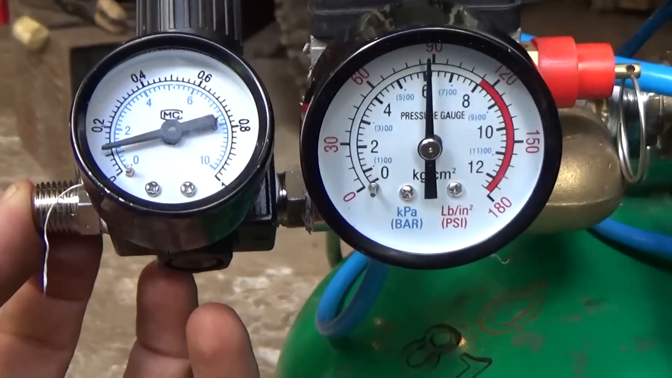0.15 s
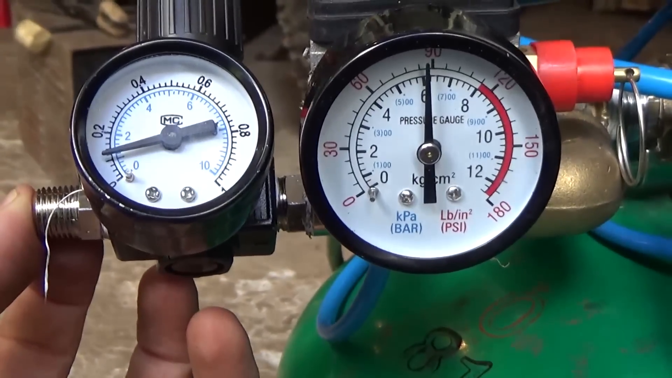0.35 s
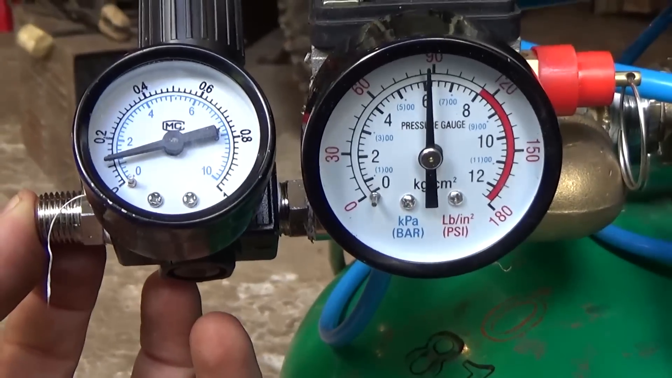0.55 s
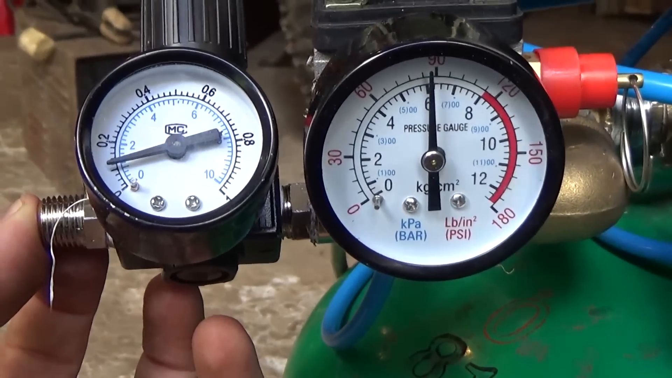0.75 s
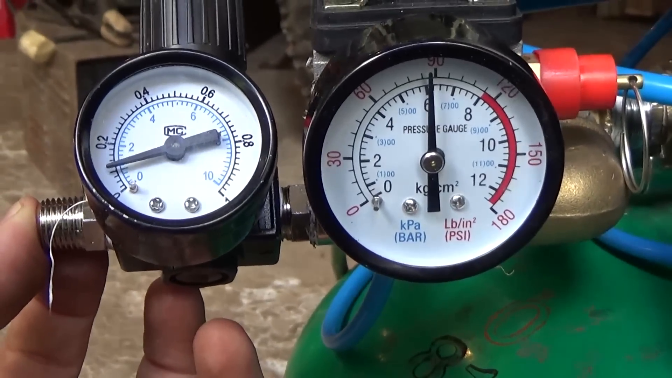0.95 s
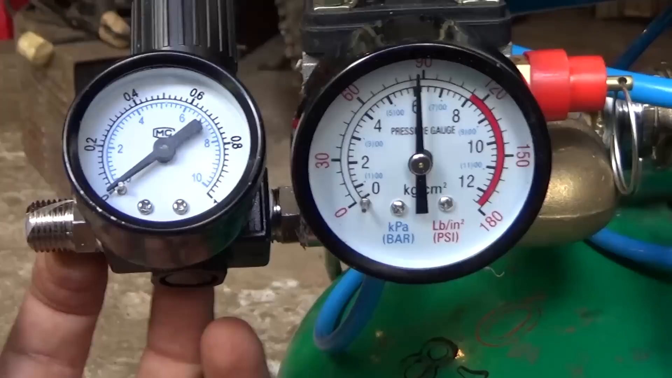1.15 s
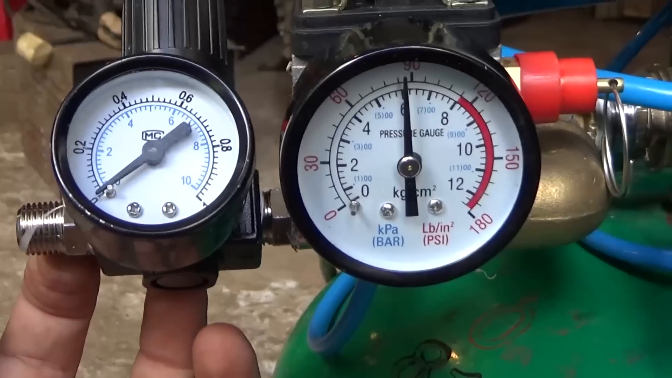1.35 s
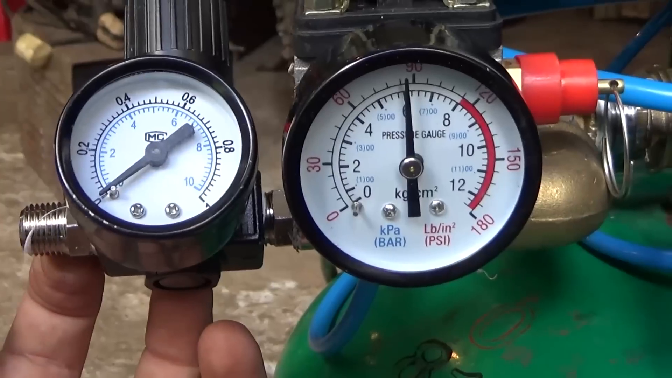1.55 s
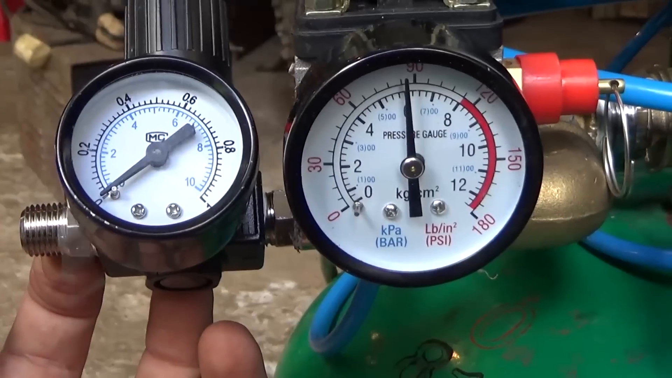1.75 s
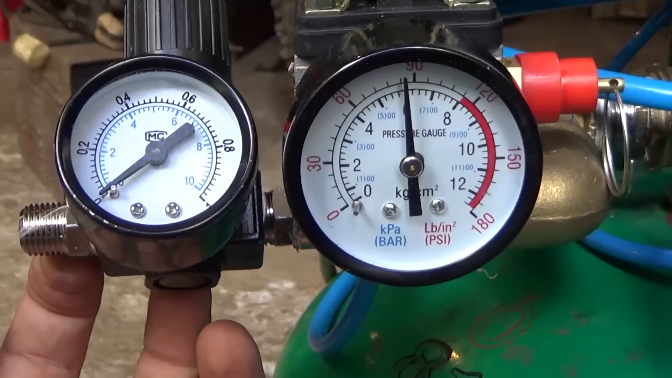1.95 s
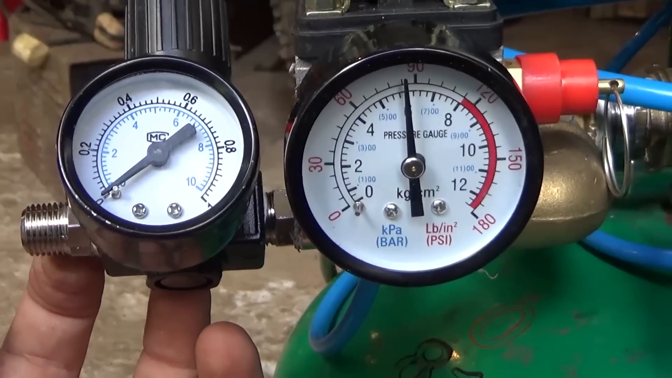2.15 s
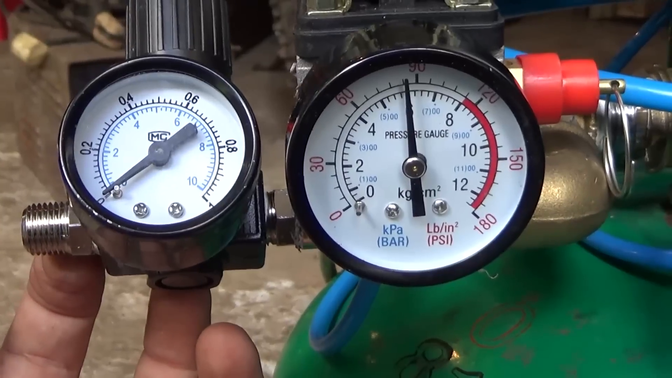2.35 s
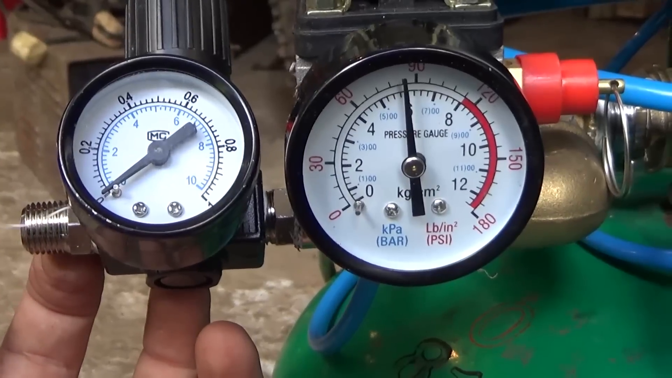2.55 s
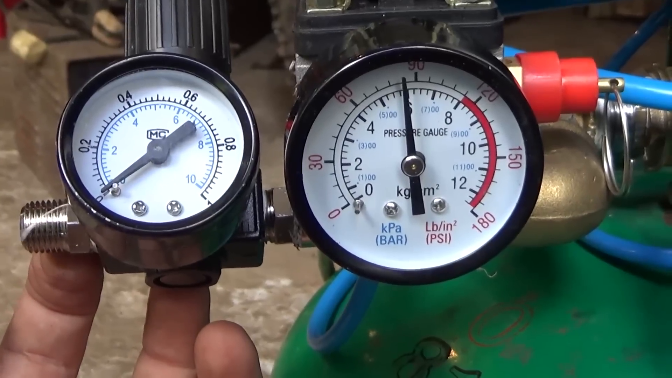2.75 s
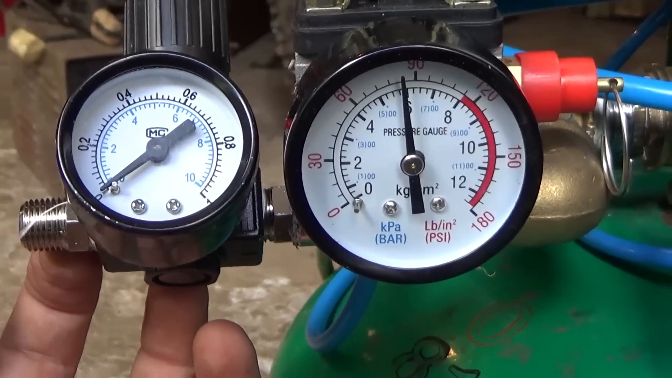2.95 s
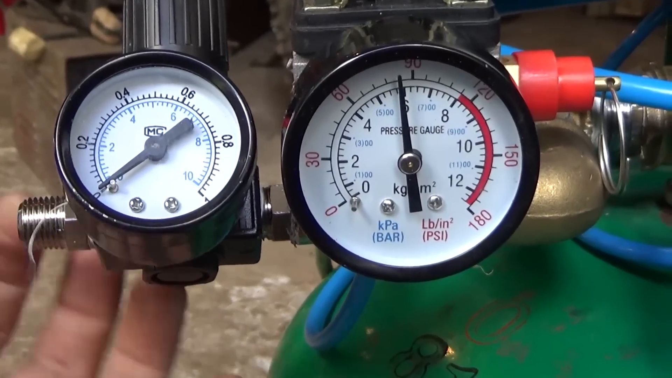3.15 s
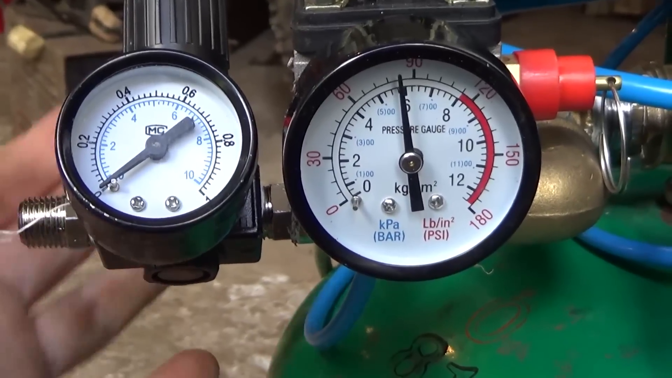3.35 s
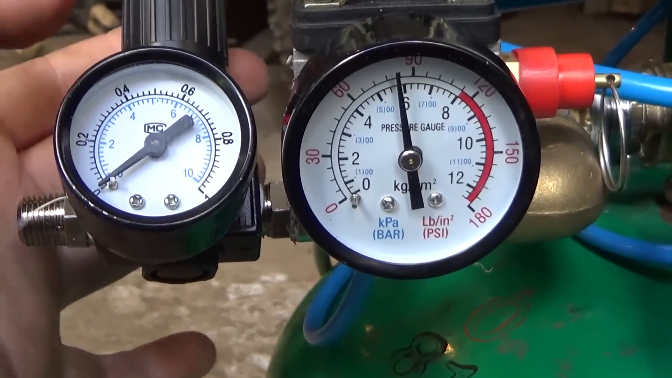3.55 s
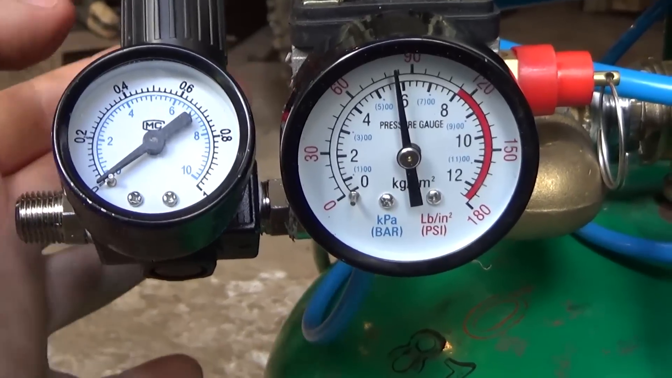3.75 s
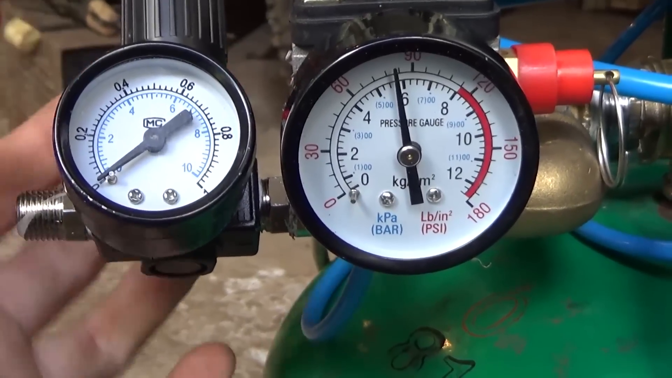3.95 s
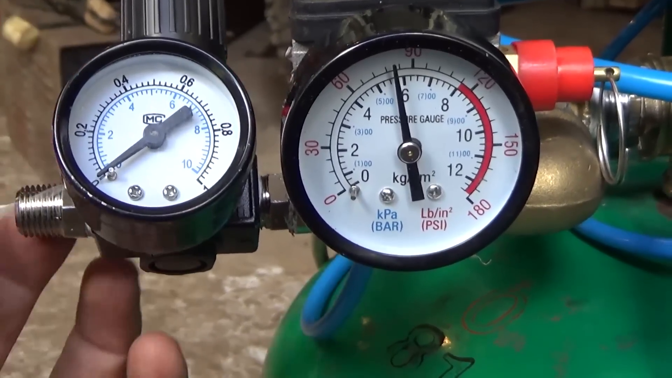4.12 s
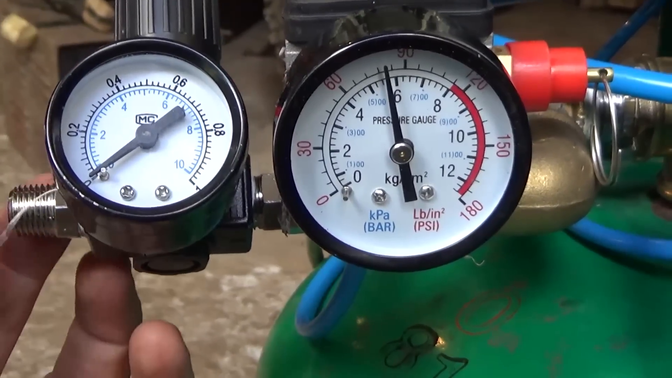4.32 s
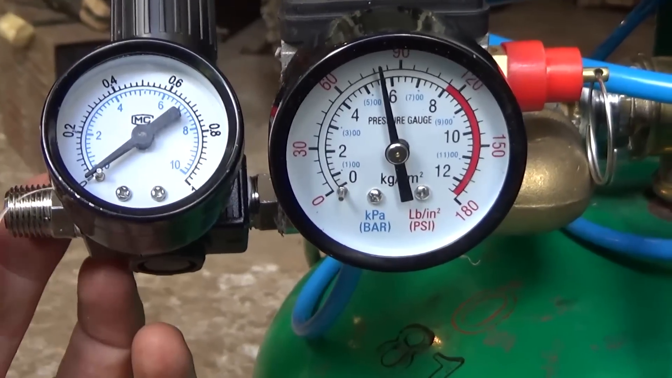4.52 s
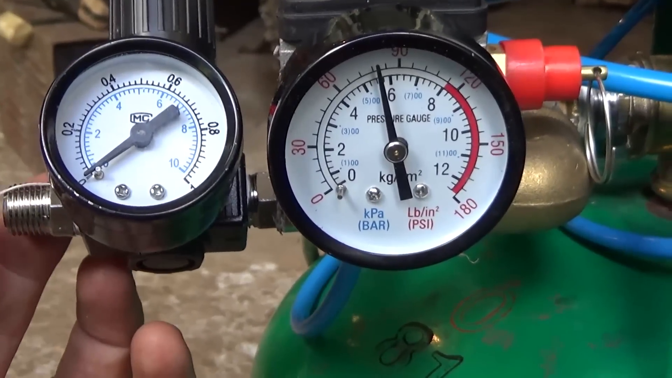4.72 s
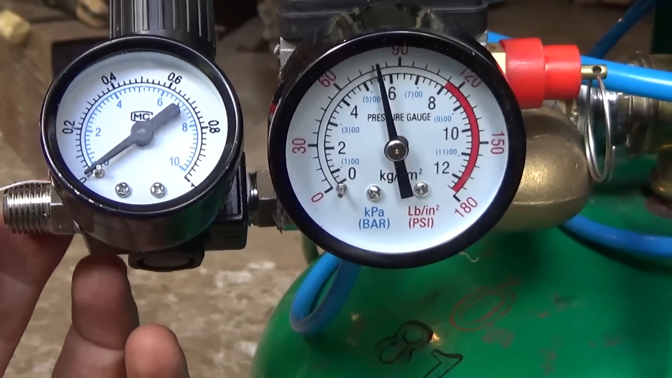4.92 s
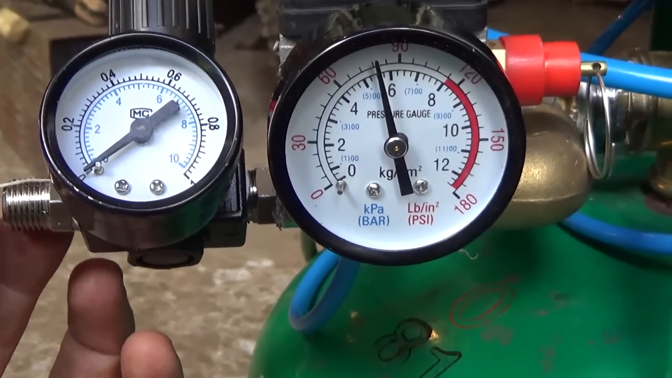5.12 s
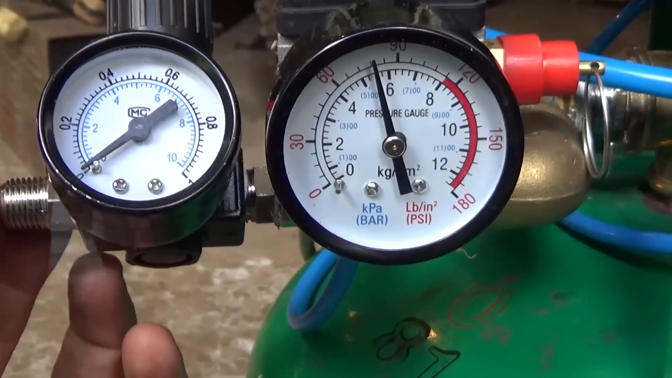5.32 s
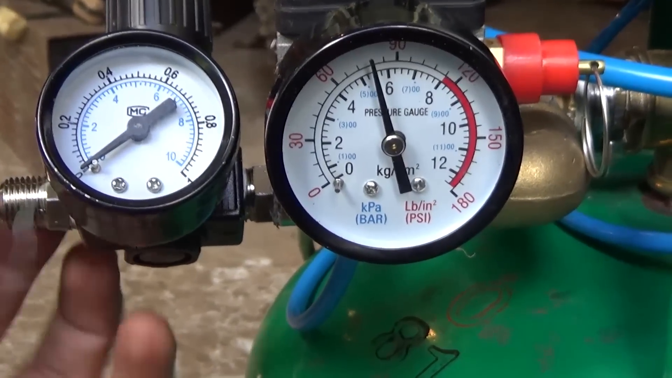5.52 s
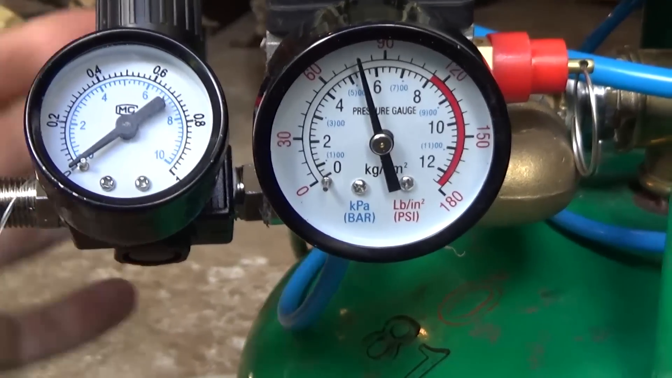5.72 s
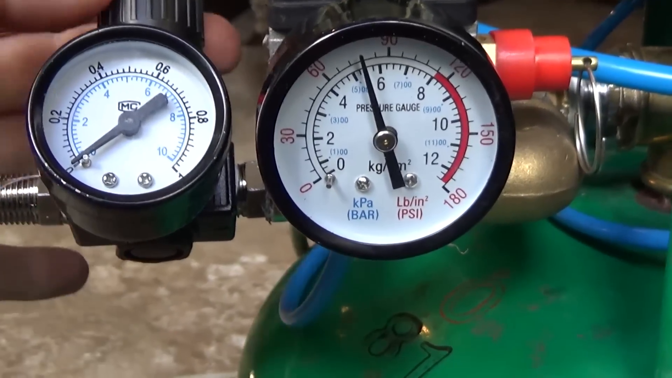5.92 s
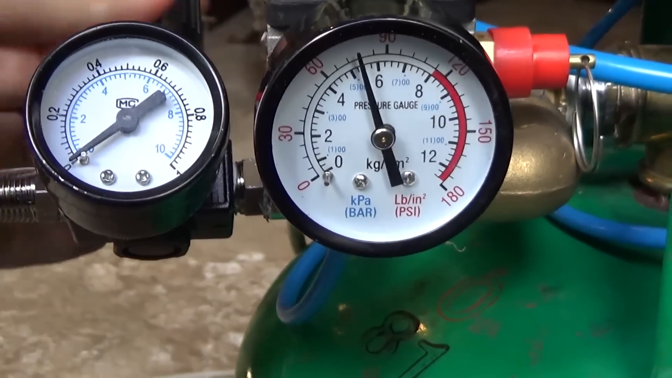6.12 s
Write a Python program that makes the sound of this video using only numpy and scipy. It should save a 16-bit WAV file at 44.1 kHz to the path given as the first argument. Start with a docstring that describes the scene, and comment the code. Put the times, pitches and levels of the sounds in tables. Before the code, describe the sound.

A quiet workshop with a faint motor hum and three tiny, fading finger ticks on a metal regulator. At one second the valve opens with a dull puff and spit, and air blasts steadily from a bare outlet very close to the stereo microphone. The bright, piercing hiss is steady at first, then swishes and changes colour as a hand moves round it, thins briefly near the end, and returns full to the cut.

```python
"""Over a faintly humming workshop, fingers touch a compressor's regulator three times, ever more softly.
At one second the valve leaks, then opens with a dull puff and a spit of air: filtered noise, briefly swelling.
The tank vents through the bare outlet, close to the microphone: coloured noise, resonances and a bright crest.
After three seconds the low rumble fades and a moving hand adds echoes and swishes and shifts the crest.
Near 5.3 s the hand briefly shields the outlet and the hiss turns thin; then the full jet returns."""
import sys
import numpy as np
from scipy import signal
from scipy.fft import rfft, irfft
from scipy.io import wavfile
from scipy.ndimage import uniform_filter1d, map_coordinates

SR = 44100
rng = np.random.default_rng(int(sys.argv[2]) if len(sys.argv) > 2 else 0)


def file_out(sig):
    """Save sig as 16-bit WAV at sys.argv[1]."""
    # one column per channel
    cols = np.atleast_2d(sig).T
    # limit, then scale
    lim = np.clip(cols, -1, 1)
    pcm = np.round(lim * 32767).astype(np.int16)
    wavfile.write(sys.argv[1], SR, pcm)


N = 276948
TIME = np.arange(N) / SR
BINS = np.maximum(np.fft.rfftfreq(N, 1 / SR), 1)   # frequency in Hz, kept above 0 for the logarithms

# the valve: first leak, opening, full flow
LEAK_S, OPEN_S, OPEN_TIME_S, FULL_FLOW_S = 1.004, 1.03, 0.028, 1.073
SEAL_DB_PER_S = 930
# resonances overshoot after the opening, then the flow settles
SURGE_S, SURGE_LENGTH_S, SURGE_DB, SETTLED_S = 1.17, 0.044, 6.5, 1.22

# likeness of left and right in the jet's noise: frequency_hz, coherence (0-1)
JET_LIKENESS = [(30, 0.53), (70, 0.37), (160, .82), (350, 0.93), (650, 0.43), (1100, 0.8), (1600, 0.98),
                (3000, 1), (4000, 1), (5300, 1), (6300, 0.88), (9500, 0.96), (13000, 0.99), (15500, 0.99)]


def jet():
    """Close at the outlet: turbulence, driven resonances and a bright crest, all fluttering together."""
    air = shielded(hiss()) + roar() + outlet_ring() + bore_ring() + crest() + sizzle() + swishes()
    leak = ramp(LEAK_S, OPEN_S) ** 2
    seal_db = np.minimum(SEAL_DB_PER_S * (TIME - FULL_FLOW_S), 0)   # the seal lets go gradually
    flutter_db = 0.35 * drift(13)
    return air * leak * from_db(seal_db + flutter_db)


# colour of the broad turbulence: frequency_hz, relative_density_db (per Hz)
HISS_COLOUR = [(300, -37), (1000, -17), (1500, -13), (2500, -6), (3400, -6), (4150, -6), (4700, 0.5),
               (5300, 0), (5900, 0), (7000, -2.5), (9000, -0.5), (11000, -0.5), (13000, -7.5),
               (16000, -16.5)]
# broad hiss, before the spit and the hand: time_s, relative_level_db
HISS_LEVEL = [(1.25, -30.5), (3.388, -29.623), (3.62, -23), (3.875, -26.864), (4.004, -28.482),
              (4.512, -26.5), (5.177, -27.899), (5.563, -23.662), (5.643, -29.5), (5.853, -28.5),
              (6.201, -26.427)]


def hiss(spit_db=5.0):
    """Broad turbulence is coloured noise; the opening spit lifts it briefly."""
    level_db = in_time(HISS_LEVEL)[0] + spit_db * spit()
    return from_db(level_db) * noise(from_db(at_bins(HISS_COLOUR)), JET_LIKENESS)


# jet resonances around fitting and fingers: centre_hz, nominal_width_hz, relative_level_db
ROAR_MODES = [(1468, 207, -4), (1747, 160, 2.5), (1898, 150, -0.5), (2125, 250, 0), (2523, 185, 0.5),
              (2910, 390, -5), (3640, 1100, -10.5)]


def roar(level_db=-33.0):
    """Turbulence drives the lower resonances around the fitting and fingers."""
    return from_db(level_db + roar_change_db()) * noise(resonances(ROAR_MODES), JET_LIKENESS)


# resonances of the outlet: centre_hz, nominal_width_hz, relative_level_db
OUTLET_MODES = [(6274, 190, -5.5), (6590, 280, -2), (6890, 140, 1.5), (7155, 160, 4.5), (7290, 100, -0.5),
                (7520, 104, 4), (7670, 170, -1)]
# ring of the outlet, before build-up and surge: time_s, relative_level_db
OUTLET_LEVEL = [(1.25, -29.5), (2.879, -29), (3.278, -26), (3.335, -19.811), (3.494, -27.337),
                (3.664, -21.5), (3.81, -36), (3.95, -23), (4.154, -28), (4.216, -24), (4.664, -28.208),
                (5.243, -20.738), (5.5, -33.479), (5.572, -25.5), (5.784, -22), (5.82, -26.562),
                (6.117, -22.5), (6.281, -24.043)]


def outlet_ring():
    """The outlet's resonances build up with the flow and overshoot."""
    level_db = in_time(OUTLET_LEVEL)[0] + building_db() + SURGE_DB * swell(SURGE_S, SURGE_LENGTH_S)
    return from_db(level_db) * noise(resonances(OUTLET_MODES), JET_LIKENESS)


# resonances of the bore: centre_hz, nominal_width_hz, relative_level_db
BORE_MODES = [(7920, 190, 2), (8310, 130, 1), (8630, 240, 0), (8990, 170, 1.5), (9350, 140, -6.5)]


def bore_ring(level_db=-31.0):
    """The bore's resonances ring steadily after the opening surge."""
    surging_db = level_db + SURGE_DB * swell(SURGE_S, SURGE_LENGTH_S)
    return from_db(surging_db) * noise(resonances(BORE_MODES), JET_LIKENESS)


# the free jet's crest, and what full cupping and the unsettled opening add
CREST_HZ, CUPPED_CREST_HZ, OPENING_CREST_HZ = 11330, -1050, -1400
CREST_WIDTH_HZ, OPENING_WIDTH_HZ = 2200, 890
CUPPED_CREST_DB, CREST_BUILD_SHARE = -0.8, 0.31
# crest, before cupping and build-up: time_s, relative_level_db
CREST_LEVEL = [(1.25, -18), (2.3, -18), (3.172, -17.5), (3.237, -21), (3.341, -20.5), (3.409, -22),
               (3.47, -14.5), (3.648, -20.5), (3.783, -14.5), (3.981, -22.328), (4.025, -17.5),
               (4.268, -20), (4.95, -20.5), (5.398, -20.5), (5.699, -21), (5.772, -26.29), (5.838, -23.513),
               (6.235, -18.5)]


def crest(steepness=2.57):
    """The jet's strongest eddies make a hump of noise whose centre and width move."""
    cup = cupping()
    unsettled = 1 - ramp(SURGE_S, SETTLED_S)
    level_db = in_time(CREST_LEVEL)[0] + CUPPED_CREST_DB * cup + CREST_BUILD_SHARE * building_db()
    centre_hz = CREST_HZ + CUPPED_CREST_HZ * cup + OPENING_CREST_HZ * unsettled
    width_hz = CREST_WIDTH_HZ + OPENING_WIDTH_HZ * unsettled
    hz, s, cells = signal.stft(rng.standard_normal((2, N)), SR, nperseg=512)
    hz = hz[:, None]
    centre, width = np.interp(s, TIME, centre_hz), np.interp(s, TIME, width_hz)
    hump = 1 / np.sqrt(1 + np.abs(2 * (hz - centre) / width) ** (2 * steepness))
    hump = hump / np.sqrt(1 + (6500 / (hz + 1)) ** 10)   # eddies this small make little low sound
    hump = hump / np.sqrt(np.sum(hump ** 2, axis=0))
    eddies = signal.istft(cells * hump, SR)[1][:, :N]
    return from_db(level_db) * rms_one(spread(eddies, JET_LIKENESS))


# colour of the highest treble: frequency_hz, relative_density_db (per Hz)
SIZZLE_COLOUR = [(10000, -40), (12300, -5), (13100, 12.5), (13700, 8), (14300, 6), (15000, 1), (15500, 6.5),
                 (16000, 0)]


def sizzle(level_db=-39.0, cupped_db=15.5, spit_db=9.5):
    """The highest noise grows as the hand cups the jet, and in the opening spit."""
    moving_db = level_db + cupped_db * cupping() + spit_db * spit()
    return from_db(moving_db) * noise(from_db(at_bins(SIZZLE_COLOUR)), JET_LIKENESS)


def spit(s=1.09, half_length_s=0.056):
    """The valve opens on a broad spit of air, a swell of height 1."""
    return swell(s, half_length_s)


def building_db(start_db=-10, full_s=1.155, build_time_s=0.034):
    """The resonances start weak and build up as the flow settles."""
    return start_db * (1 - ramp(full_s - build_time_s, full_s))


def roar_change_db(sag_db_per_s=.08, cupped_db=-1.5, shield_db=-11.0):
    """The roar builds up, sinks with the tank pressure and drops behind the hand."""
    emptying_db = -sag_db_per_s * (TIME - OPEN_S)
    hand_db = cupped_db * cupping() + shield_db * shielding()
    return building_db() + emptying_db + hand_db


# fingers graze the jet or rest at its edge: peak_s, half_length_s, relative_level_db, pitch_hz
SWISHES = [(3.24, .06, -28, 8600), (3.40, .07, -24.5, 9000), (3.66, .18, -29.5, 6080),
           (3.91, .105, -21.5, 9000), (4.056, .06, -28, 6440), (4.26, .08, -26, 9400),
           (4.9, .55, -26.5, 10380), (5.665, .031, -20, 9500), (5.776, .09, -20.5, 11850),
           (5.835, .05, -25.5, 8280), (6.2, .07, -34.5, 5550)]


def swishes(width_hz=830):
    """Each finger that grazes the jet sheds a band of noise with a pitch of its own."""
    out, white = 0, rng.standard_normal((2, N))
    for s, half_length_s, db, hz in SWISHES:
        edges = [hz - width_hz / 2, hz + width_hz / 2]
        band = signal.sosfilt(signal.butter(2, edges, "band", fs=SR, output="sos"), white)
        out = out + from_db(db) * swell(s, half_length_s) * rms_one(band)
    return spread(out, JET_LIKENESS) / np.sqrt(2)


# colour of the low rush: frequency_hz, relative_density_db (per Hz)
RUSH_COLOUR = [(25, -23), (70, -29), (140, -18.5), (250, -7), (400, -1.5), (700, 4), (1100, 2), (1500, -7),
               (2500, -13)]


def rush(level_db=-52.5, puff_db=-47.0, puff_s=1.085, puff_length_s=0.021, follow=0.37):
    """The low rush partly follows the roar; the first air leaves as a dull puff."""
    opening = ramp(OPEN_S, OPEN_S + OPEN_TIME_S)
    flow_gain = opening * from_db(level_db + follow * roar_change_db())
    flow = flow_gain * noise(from_db(at_bins(RUSH_COLOUR)), JET_LIKENESS)
    puff_modes = [(290, 75, -0.18), (486, 150, -1.1), (800, 410, 0)]
    puff_gain = from_db(puff_db) * swell(puff_s, puff_length_s)
    return flow + puff_gain * noise(resonances(puff_modes), ROOM_LIKENESS)


# colour of the deep flow rumble: frequency_hz, relative_density_db (per Hz)
RUMBLE_COLOUR = [(25, 4), (100, 1), (200, -6), (400, -20)]


def rumble(level_db=-78.0, fade_from_s=3.1, fade_to_s=3.4):
    """Deep turbulence, which fades as the hand leaves its place under the outlet."""
    held = ramp(OPEN_S, OPEN_S + OPEN_TIME_S) * (1 - ramp(fade_from_s, fade_to_s))
    return held * from_db(level_db) * noise(from_db(at_bins(RUMBLE_COLOUR)), JET_LIKENESS)


# how far the hand cups the jet: time_s, cupping (0 = clear of it, 1 = cupped round it)
CUPPING = [(1.25, 0.133), (3.073, 0.15), (3.413, 0.63), (3.609, 0.57), (3.811, 0.064), (3.923, 1.007),
           (4.044, -0.003), (4.121, 0.17), (4.142, 0.43), (4.303, 0.33), (4.393, 0.8), (4.992, 0.78),
           (5.087, 0.56), (5.58, 0.778), (5.652, 0.641), (5.748, 0.48), (5.913, 0.83), (6.263, 0.361)]


def cupping():
    """How far the hand cups the jet, at every sample, held between 0 and 1."""
    return np.clip(in_time(CUPPING)[0], 0, 1)


def hand_motion(full_speed=2.0, smooth_s=.25):
    """How busy the hand is: 0 at rest, 1 from so many full cupping moves a second."""
    speed = np.abs(np.gradient(cupping())) * SR
    return np.minimum(uniform_filter1d(speed, int(smooth_s * SR)) / full_speed, 1)


def palm_delay_ms(open_ms=0.424, cupped_ms=.208):
    """The echo off the palm comes later as the hand cups; full cupping adds cupped_ms."""
    return open_ms + cupped_ms * cupping()


# echo off the nearest finger: time_s, delay_ms, share (of the short waves, 0-1)
FINGER = [(1.4, 0.24, 0.12), (3.06, 0.25, 0.18), (3.168, 0.25, 0.292), (3.397, 0.23, 0.23),
          (3.501, 0.373, 0), (3.759, 0.29, 0.009), (3.959, 0.265, 0.25), (4.064, 0.205, 0.1),
          (4.26, 0.21, 0.45), (4.473, 0.198, 0.15), (4.929, 0.201, 0.193), (5.149, 0.22, 0.44),
          (5.375, 0.207, 0.4), (5.571, 0.207, 0.18), (5.647, 0.21, 0.27), (5.753, 0.32, 0.034),
          (6.044, 0.352, 0.005), (6.252, 0.332, 0.32)]


def hand(x, size_hz=3000, palm_share=.23, cupped_share=-.3):
    """Fingers and palm reflect mostly short waves; moving peaks and notches sweep through the hiss."""
    palm = palm_delay_ms(), np.maximum(palm_share + cupped_share * cupping(), 0)
    short_waves = irfft(rfft(x) / np.sqrt(1 + (size_hz / BINS) ** 2), N)
    for delay_ms, share in in_time(FINGER), palm:
        when = np.arange(N) - delay_ms * SR / 1000
        x = x + share * np.array([map_coordinates(side, [when], order=5) for side in short_waves])
    return x


def bounces(x, share=0.04, moving_share=0.11, count=3, shortest_ms=0.799, longest_ms=1.8, stretch=0.6):
    """Longer paths between palm and gauges draw gliding ripples, deepest as the hand moves."""
    palm_ms = palm_delay_ms()
    depth = share + moving_share * hand_motion()
    treble = irfft(rfft(x) / np.sqrt(1 + (5000 / BINS) ** 4), N)
    for k, path_ms in enumerate(np.geomspace(shortest_ms, longest_ms, count)):
        delay_ms = path_ms + stretch * (k + 1) * (palm_ms - palm_ms.mean())
        when = np.arange(N) - delay_ms * SR / 1000
        # each path adds one delayed copy of the same treble
        x = x + depth * np.array([map_coordinates(side, [when], order=3) for side in treble])
    return x


def shielding(from_s=5.33, to_s=5.57, edge_s=0.037):
    """1 while the hand shields the outlet, else 0, with short sloping edges."""
    inside_s = np.minimum(TIME - from_s, to_s - TIME)
    return np.clip(.5 + inside_s / edge_s, 0, 1)


def shielded(x, edge_hz=4350, open_db=1.0, shield_db=-5.0):
    """The shielding hand weakens the hiss below a steep edge."""
    lower = irfft(rfft(x) / (1 + (BINS / edge_hz) ** 20), N)
    return x + (from_db(open_db + shield_db * shielding()) - 1) * lower


# colour of the jet's stereo balance: frequency_hz, left_minus_right_db
JET_BALANCE = [(100, 1), (400, .4), (1100, 2.5), (2400, 1.2), (3800, 0.5), (5500, 0), (6300, 2.5),
               (8200, 2.5), (9500, 2.5), (11400, 2), (13600, 3.5), (15500, -4)]


def surroundings(x, room_db=-14.5, t60=0.2, lean_db=-0.8, cupped_lean_db=0.5):
    """The jet's balance varies with pitch and cupping; a short diffuse workshop tail follows."""
    t = TIME[:SR // 3]
    tail = rms_one(rng.standard_normal(len(t)) * from_db(-60 * t / t60) * (t > .004)) / np.sqrt(len(t))
    balance = from_db(at_bins(JET_BALANCE) / 2)
    heard = irfft(rfft(x) * np.array([balance, 1 / balance]), N) * (TIME > 1)
    heard = heard + from_db(room_db) * signal.fftconvolve(heard, tail[None], axes=1)[:, :N]
    left_minus_right_db = lean_db + cupped_lean_db * cupping()
    return heard * from_db(left_minus_right_db * [[.5], [-.5]])


# finger touches on the regulator: start_s, relative_level_db, low_resonance_weight_db
TICKS = [(0.093, -48, 2), (0.209, -58, -5), (0.284, -70, -10)]
# damped resonances of the regulator: centre_hz, nominal_width_hz, relative_level_db
REGULATOR = [(760, 260, -6), (1280, 260, -3), (1650, 260, 1), (2000, 160, 2), (2600, 600, -6),
             (3400, 160, -1), (3950, 230, -11), (4900, 1200, -9.5), (7500, 3500, -19)]


def ticks(scuff_s=0.0041, tail_db=-15.0, t60=.1):
    """Each touch scuffs the damped regulator, with a short decaying tail; light ones sound thinner."""
    out = 0
    for s, db, low_db in TICKS:
        age = TIME - s
        scuff = np.exp(-(age / scuff_s) ** 2)
        tail = (age > 0) * from_db(tail_db - 60 * np.abs(age) / t60)
        colour = resonances(REGULATOR) * from_db(low_db / (1 + (BINS / 3000) ** 4))
        out = out + from_db(db) * (scuff + tail) * noise(colour, JET_LIKENESS)
    return out


# likeness of left and right in the room: frequency_hz, coherence (0-1)
ROOM_LIKENESS = [(60, 0.79), (180, 0.99), (550, 0.63), (1650, 0.29), (4970, 0.62), (15000, 0.99)]
# colour of the workshop's background: frequency_hz, relative_density_db (per Hz)
FLOOR_COLOUR = [(25, -19), (50, -19), (100, -17), (150, -4.5), (220, -0.5), (330, -1), (520, -3.5),
                (720, 2.5), (1100, -4.5), (1400, -4), (1650, -3), (2100, -7), (10500, -13.5), (16000, -22)]
# lines of a motor's hum, before gain control: pitch_hz, mean_level_db (rms)
HUM = [(215.3, -81), (295.5, -82), (344.5, -71), (393.6, -71.5), (1680, -79), (1873, -86), (2369, -84),
       (2514, -84), (3155, -85), (5846, -90), (7440, -92)]


def workshop(floor_db=-63):
    """Room noise and a motor's hum, wavering sines whose neighbouring lines beat."""
    floor = from_db(floor_db) * noise(from_db(at_bins(FLOOR_COLOUR)), ROOM_LIKENESS)
    lines = 0
    for hz, db in HUM:
        lines = lines + from_db(db + drift(5) / 2) * np.sin(2 * np.pi * (hz * TIME + rng.random()))
    return floor + np.sqrt(2) * lines


def whine(level_db=-73.5, centre_hz=2490, throb_hz=24.9):
    """A thin whine, a narrow band of noise, throbs at about half the motor's speed."""
    throb = (1 + np.cos(2 * np.pi * throb_hz * TIME)) / 2
    return from_db(level_db) * rms_one(throb * noise(resonances([(centre_hz, 130, 0)]), ROOM_LIKENESS))


def noise(gain, likeness):
    """Stereo noise of a given colour, rms 1."""
    return rms_one(spread(rng.standard_normal((2, N)), likeness, gain))


def spread(pair, likeness, gain=1):
    """Two noises become left and right with the given likeness and colour."""
    alike = np.clip(at_bins(likeness), 0, .995)
    mid, side = rfft(pair) * gain
    return irfft(np.sqrt(1 + alike) * mid + np.sqrt(1 - alike) * side * [[1], [-1]], N)


def resonances(modes):
    """Gain over frequency of separately driven, steep-sided resonances."""
    power = 0
    for hz, width, db in modes:
        power = power + (from_db(db) / (1 + ((BINS - hz) / (0.68 * width)) ** 2)) ** 2
    return np.sqrt(power)


def drift(rate_hz):
    """Slow chance with spread 1."""
    return rms_one(irfft(rfft(rng.standard_normal(N)) / (1 + (BINS / rate_hz) ** 2), N))


def swell(s, half_length_s):
    """A smooth rise and fall of height 1."""
    return np.exp(-((TIME - s) / half_length_s) ** 2)


def ramp(from_s, to_s):
    """A straight rise from 0 to 1."""
    return np.clip((TIME - from_s) / max(to_s - from_s, 1e-3), 0, 1)


def in_time(rows):
    """The columns of a curve, at every sample."""
    s, *columns = np.transpose(rows)
    return [np.interp(TIME, s, c) for c in columns]


def at_bins(points):
    """A table over frequency, joined on a log axis."""
    hz, value = np.transpose(points)
    return np.interp(np.log(BINS), np.log(hz), value)


def from_db(db):
    """Decibels to gain."""
    return 10 ** (np.asarray(db) / 20)


def rms_one(x):
    """Scale to unit power."""
    return x / np.sqrt(np.mean(np.abs(x) ** 2) + 1e-20)


def scene(near_db=10.0):
    """The venting air, very close to the microphone, over the quiet workshop."""
    air = bounces(hand(jet())) + rush() + rumble()
    return from_db(near_db) * surroundings(air) + ticks() + workshop() + whine()


def record(dry, threshold_db=-49.5, gain_range_db=10.0, cutoff_hz=15850):
    """Gain control turns the loud jet down, and the background with it; the top is cut steeply."""
    power = signal.lfilter([.01], [1, -.99], np.mean(dry ** 2, axis=0))
    turned_down_db = np.clip(10 * np.log10(power + 1e-12) - threshold_db, 0, gain_range_db)
    taps = signal.firwin(401, cutoff_hz, window=("kaiser", 8), fs=SR)
    return signal.fftconvolve(dry * from_db(-turned_down_db), taps[None], mode="same", axes=1)


dry = scene()
out = record(dry)
file_out(out)
```